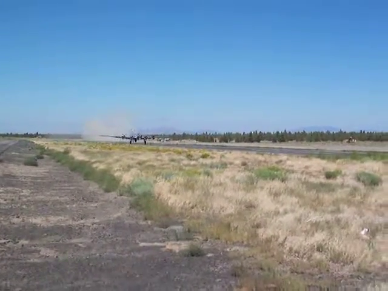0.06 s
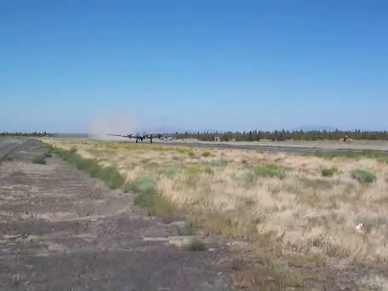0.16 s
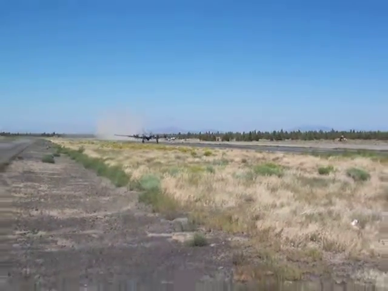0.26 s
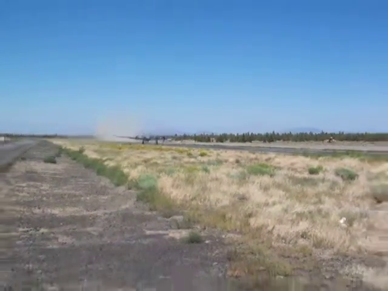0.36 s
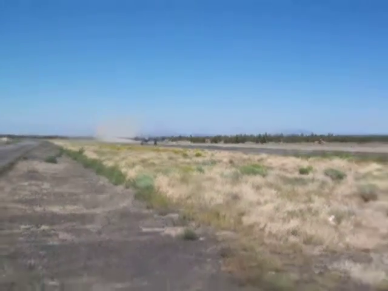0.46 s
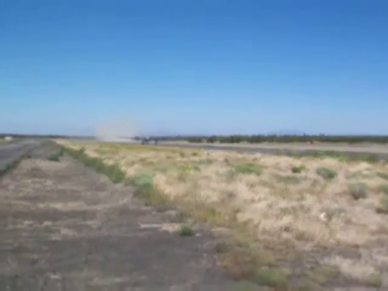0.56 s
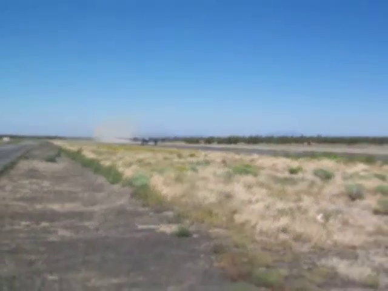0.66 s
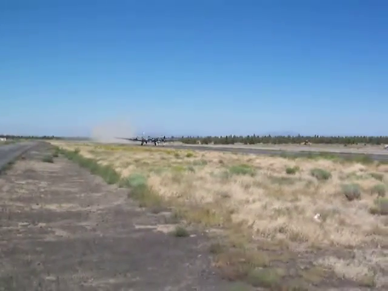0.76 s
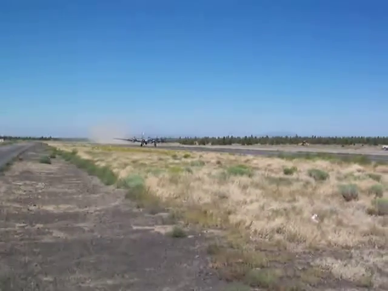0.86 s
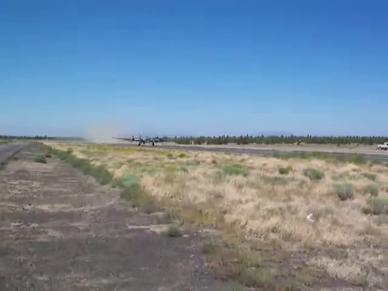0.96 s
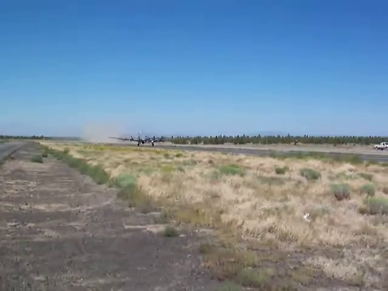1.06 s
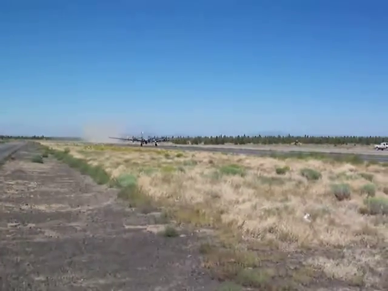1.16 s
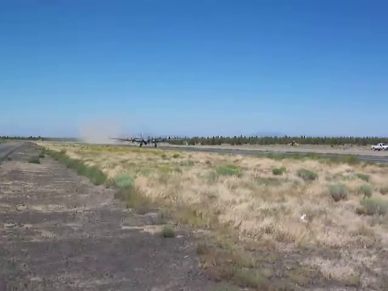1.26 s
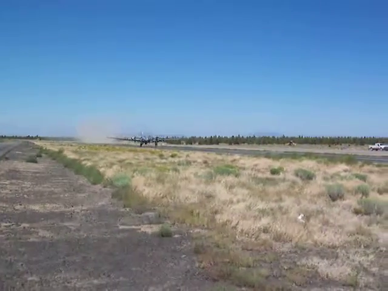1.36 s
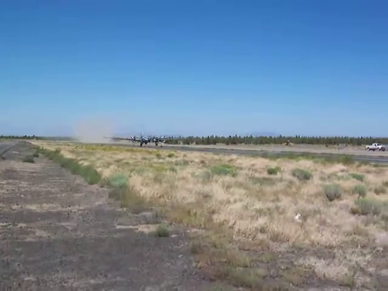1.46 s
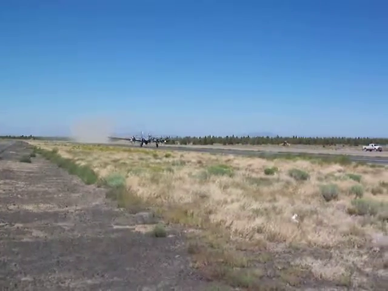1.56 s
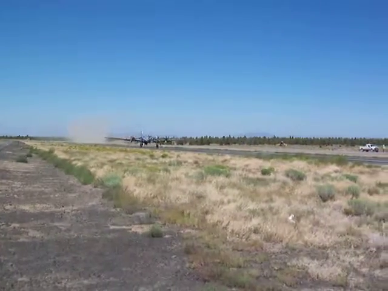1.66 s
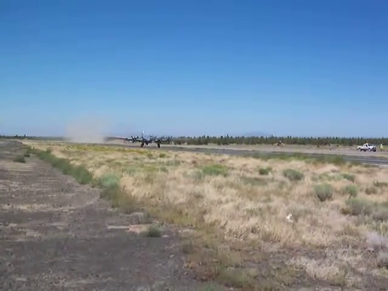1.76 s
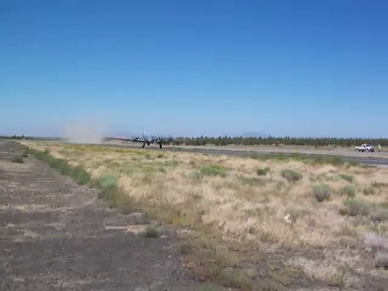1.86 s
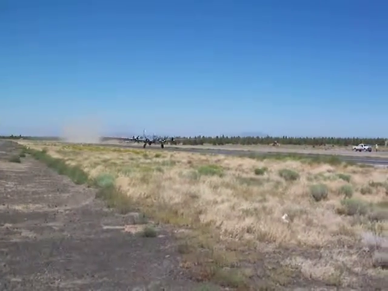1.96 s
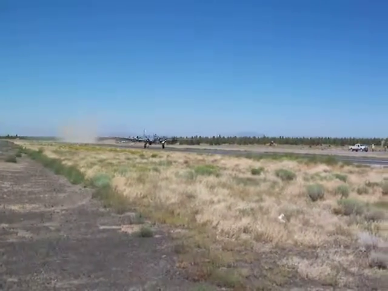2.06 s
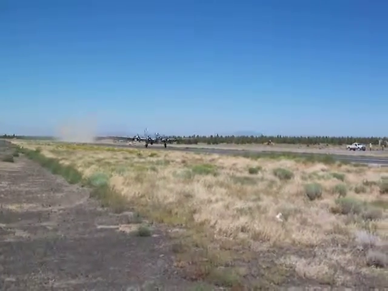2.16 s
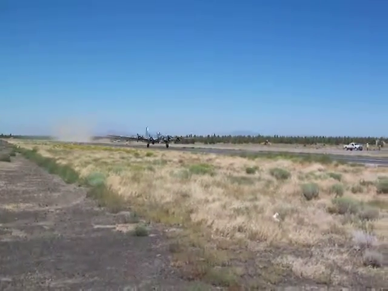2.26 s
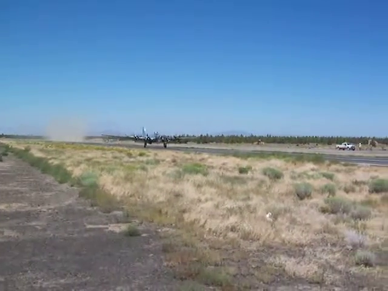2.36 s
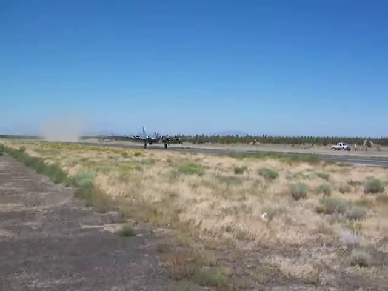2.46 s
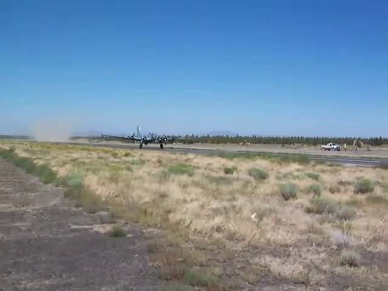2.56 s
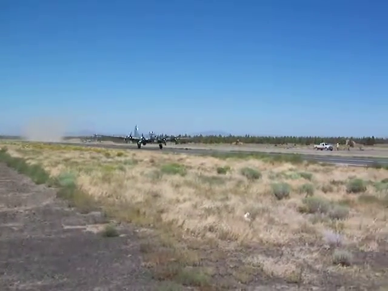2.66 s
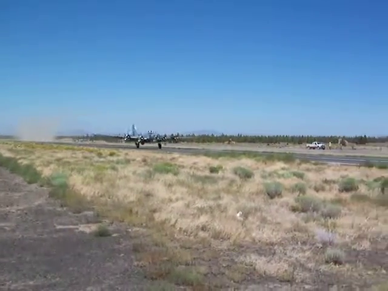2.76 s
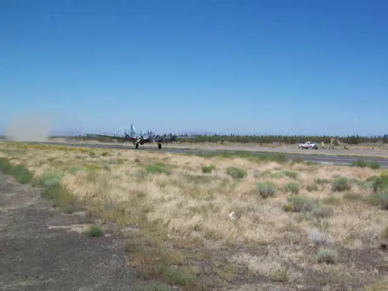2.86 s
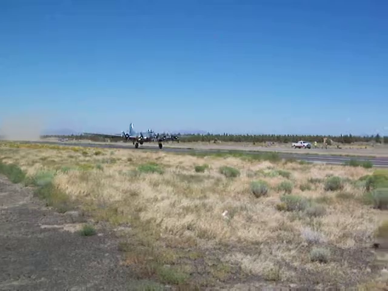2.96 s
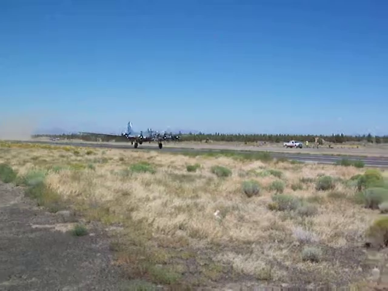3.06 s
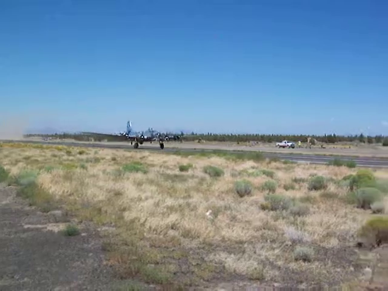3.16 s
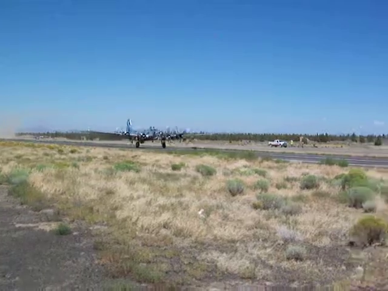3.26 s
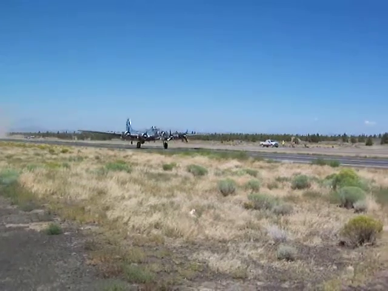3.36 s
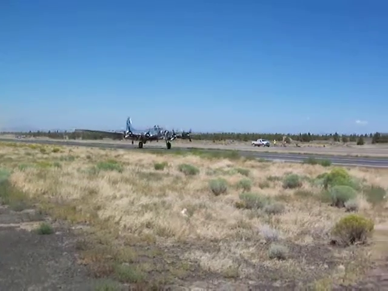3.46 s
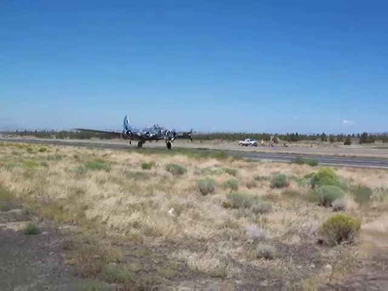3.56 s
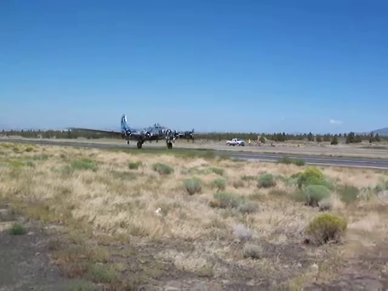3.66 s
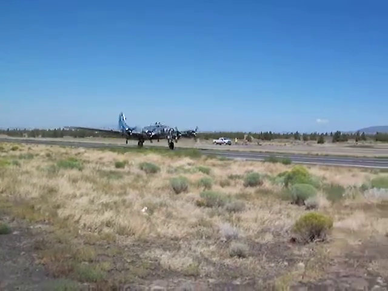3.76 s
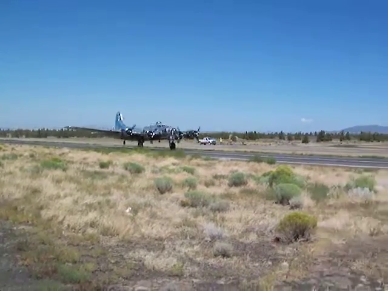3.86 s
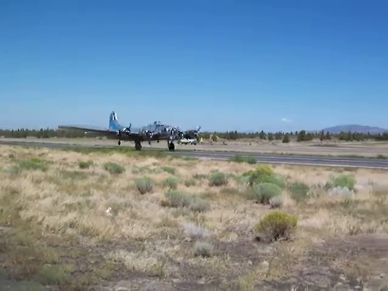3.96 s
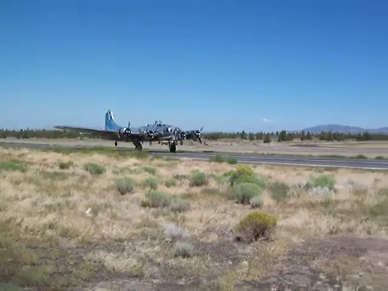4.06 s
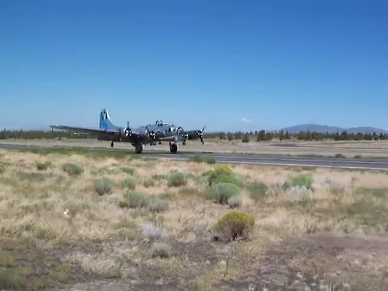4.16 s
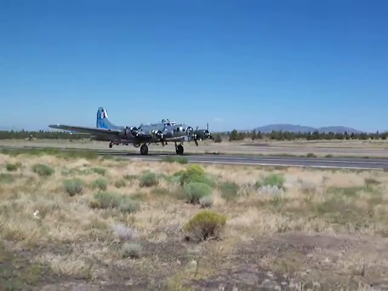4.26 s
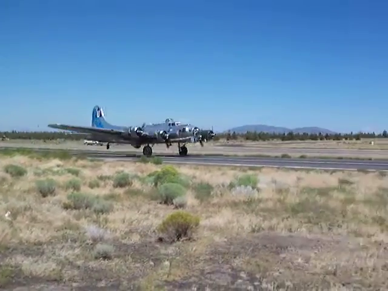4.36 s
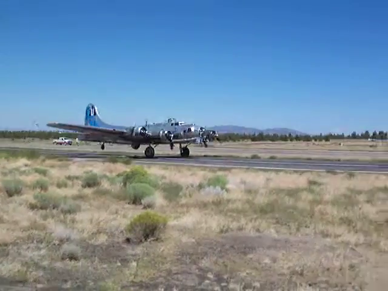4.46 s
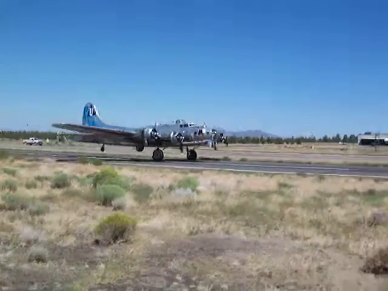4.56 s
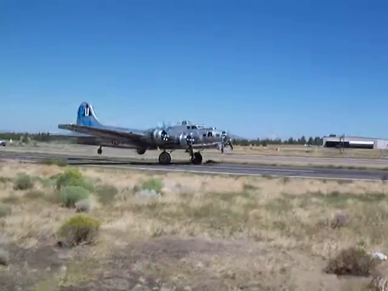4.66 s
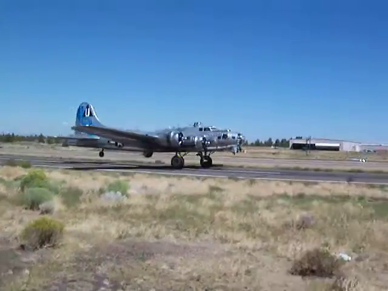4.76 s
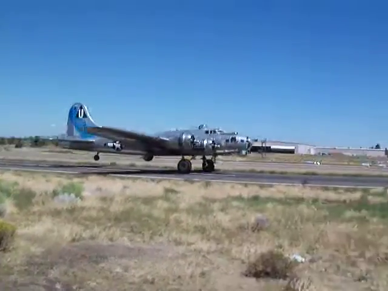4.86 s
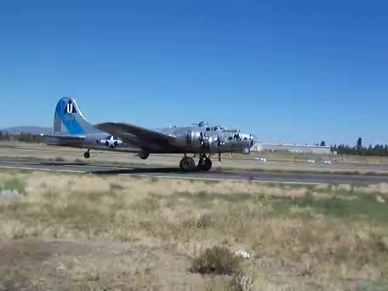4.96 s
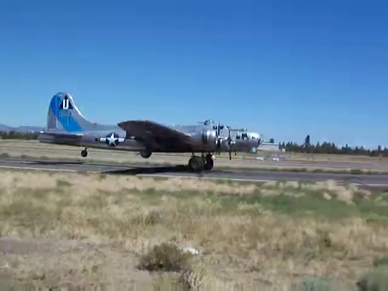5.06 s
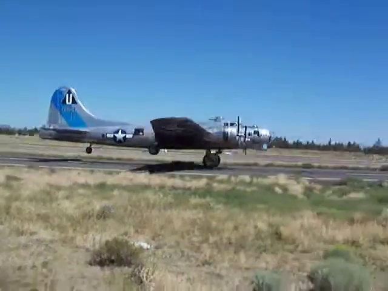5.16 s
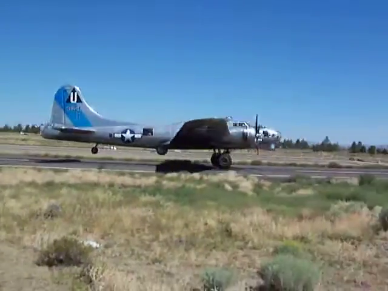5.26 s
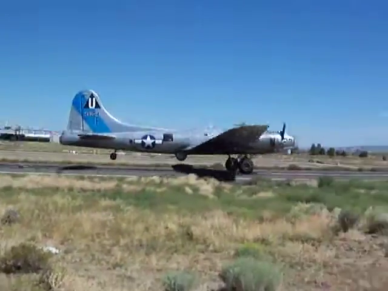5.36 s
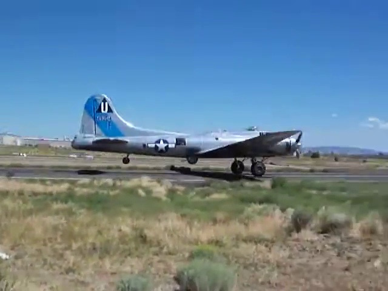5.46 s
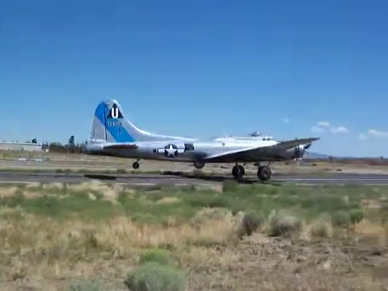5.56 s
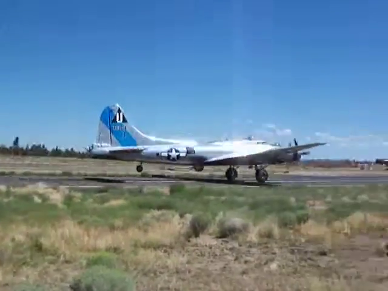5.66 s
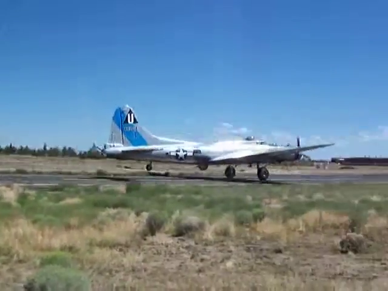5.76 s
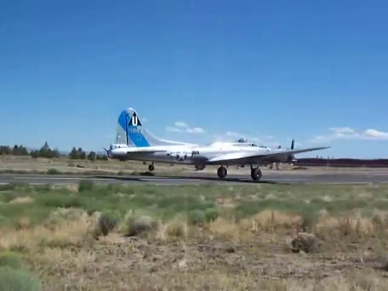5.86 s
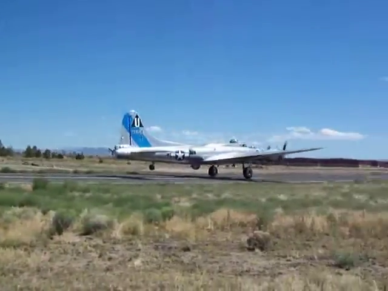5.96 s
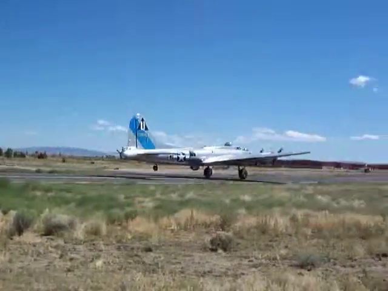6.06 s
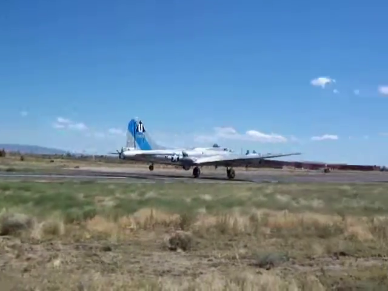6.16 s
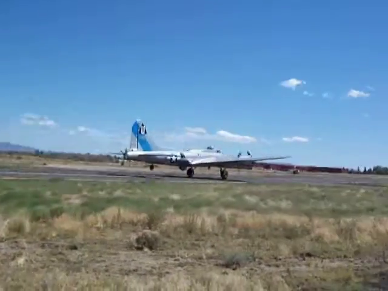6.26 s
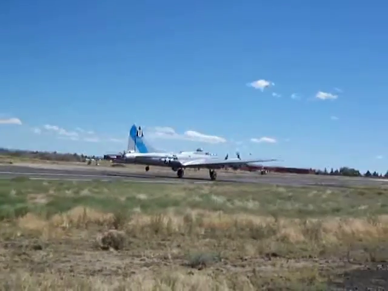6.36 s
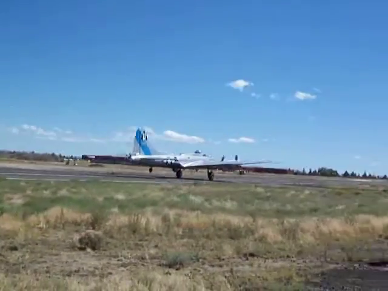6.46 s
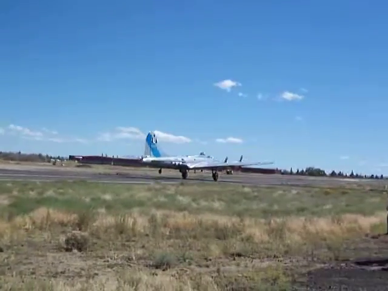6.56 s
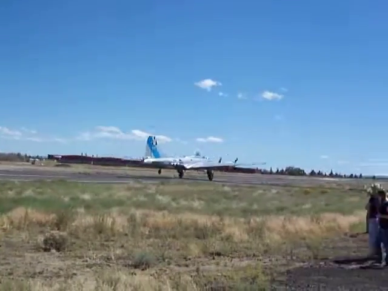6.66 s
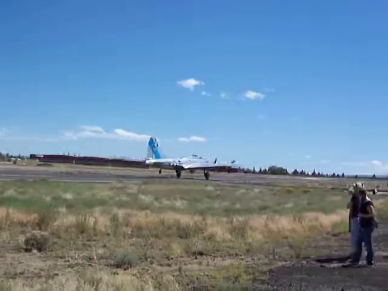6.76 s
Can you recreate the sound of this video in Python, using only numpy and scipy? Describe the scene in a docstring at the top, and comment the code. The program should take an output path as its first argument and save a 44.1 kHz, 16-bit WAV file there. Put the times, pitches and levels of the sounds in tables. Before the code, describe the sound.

Beside an open runway, wind buffets the microphone with low rumble and hard slaps while a four-engined propeller plane drones in the distance. The throbbing drone swells, joined by a rasping exhaust roar and a brief thin whine. The gusts die away as the plane passes close at about five seconds, its pitch sinking, and the engines then fade quickly as it moves off.

```python
"""Beside a runway, a four-engined piston bomber runs up at full power and passes close to a small camera.
Its propellers drone and beat against each other, the radial engines' exhausts roar and rasp with
every firing, a supercharger whines, and all sink in pitch as the plane goes by.
Until it is near, gusts buffet the microphone with rumble and hard slaps of air.
A tick and a brief rustle sound beside the camera in the first second."""
import sys
import numpy as np
from scipy.fft import rfft, irfft, next_fast_len
from scipy.io import wavfile
from scipy.ndimage import map_coordinates

SR = 44100
rng = np.random.default_rng(int(sys.argv[2]) if len(sys.argv) > 2 else 0)


def waveform_to_disk(signal):
    """Save audio, clipped to [-1, 1], as 16-bit WAV at the path in sys.argv[1]."""
    frames = np.transpose(np.atleast_2d(signal))
    scaled = np.clip(frames, -1, 1) * 32767
    samples = np.round(scaled).astype(np.int16)
    wavfile.write(sys.argv[1], SR, samples)


N = 300042
SIDE_ON_S = 5.42  # the plane is side-on to the camera

# The exhaust's swell and fade. Each row: time in seconds, tone level in dB, roar level in dB.
EXHAUST_LEVELS = [(0, -51.5, -42.5), (1.5, -37.5, -44), (4.1, -38.5, -30.5), (4.5, -34, -40.5),
                  (5.15, -33.5, -32.5), (6.1, -43.5, -38), (6.8, -49.5, -55.5)]


def amp(db):
    """Decibels to gain."""
    return 10 ** (np.asarray(db) / 20)


def unit(x):
    """Scale to rms 1."""
    return x / np.sqrt(np.mean(x ** 2) + 1e-20)


def curves(rows):
    """One value per sample for each column after the time."""
    times, *columns = np.transpose(rows)
    return [np.interp(np.arange(N) / SR, times, column) for column in columns]


def swell(peak_s, width_s):
    """A bell-shaped envelope that peaks at 1."""
    return np.exp(-((np.arange(N) / SR - peak_s) / width_s) ** 2)


def wobble(rate):
    """A smooth random curve, rate knots a second."""
    position = np.arange(N) * rate / SR
    coarse = position[::32]
    knots = rng.standard_normal(int(N * rate / SR) + 4)
    return np.interp(position, coarse, map_coordinates(knots, [coarse]))


def filtered(x, response):
    """Filter x by a complex response of frequency."""
    size = next_fast_len(N + SR // 4)
    return irfft(rfft(x, size) * response(np.fft.rfftfreq(size, 1 / SR)), size)[:N]


def band(x, low_hz, high_hz):
    """The part of x between two frequencies."""
    return filtered(x, lambda hz: (hz >= low_hz) & (hz < high_hz))


def lowpass(x, corner_hz, steepness):
    """Roll off the treble."""
    return filtered(x, lambda hz: 1 / (1 + (hz / corner_hz) ** steepness))


def noise(colour):
    """Noise of rms 1 with a spectrum of (Hz, dB) points."""
    points_hz, db = np.transpose(colour)
    response = lambda hz: amp(np.interp(np.log(hz + 1), np.log(points_hz), db))
    return unit(filtered(rng.standard_normal(N), response))


def tone(turns, drift, flutter, flutter_rate=25):
    """A sine of rms 1 whose phase drifts and whose level flutters in the turbulent air."""
    phase = 2 * np.pi * (turns + rng.random()) + drift * wobble(4)
    return unit(np.sin(phase) * (1 + flutter * wobble(flutter_rate)))


def propellers(blade_turns):
    """Three strong blade tones that beat, and overtones smeared by the four unequal shaft speeds."""
    # The drone, each tone beamed its own way as the plane goes by.
    # Each row: time in seconds, then the levels of harmonics 1, 2 and 3 in dB.
    drone_levels = [(0, -41.5, -43.5, -55), (2, -31, -34, -47.5), (3.2, -33, -28.5, -35),
                    (3.45, -22.5, -36, -35), (3.9, -24, -24, -39.5), (4.3, -21, -36, -31.5),
                    (4.58, -24.5, -24, -33.5), (4.9, -20.5, -29.5, -26.5), (5.12, -38, -17.5, -36.5),
                    (5.36, -24.5, -25, -21), (5.6, -22.5, -31.5, -47), (5.85, -26, -34.5, -40),
                    (6.08, -30, -31.5, -48.5), (6.8, -49.5, -50.5, -54)]
    # The buzz above it. Each row: multiple of the blade rate, relative level in dB.
    overtones = [(4, -6), (5, -11.5), (6, -16.5), (7, -15), (8, -17), (9, -15)]
    beat_hz, in_step_s, beat_depths = 1.89, 4.28, (.66, .58, .77)
    t = np.arange(N) / SR
    in_view = 1 - swell(SIDE_ON_S, .39)  # side-on, one propeller hides the rest and the beating stops
    drone = np.zeros(N)
    for k, (db, depth) in enumerate(zip(curves(drone_levels), beat_depths), 1):
        beat = np.sqrt(1 + depth * in_view * np.cos(2 * np.pi * k * beat_hz * (t - in_step_s)))
        drone += amp(db) * beat * tone(k * blade_turns, drift=.15, flutter=.08)
    buzz = sum(amp(db) * tone(round(k) * blade_turns, drift=.9, flutter=.4) for k, db in overtones)
    # the overtones are thrown out sideways, in the plane of the propellers
    buzz_db = curves(EXHAUST_LEVELS)[0] - 6 + 10 * swell(5.05, .42)
    return drone + amp(buzz_db) * buzz


def exhaust(cycles):
    """Unequal cylinders sound the orders of the engine cycle over a low roar."""
    # A nine-cylinder four-stroke's tones. Each row: multiple of the cycle rate, relative level in dB.
    orders = [(1, -9), (2, -3), (3, -8), (4, -4), (5, -1.5), (6, -9), (7, 0), (8, -10), (9, -4), (10, -9),
              (11, -8), (12, -14), (13, -14), (14, -10), (15, -18), (16, -18), (17, -17), (18, -20)]
    # The roar's spectrum. Each row: frequency in Hz, relative level in dB.
    roar_colour = [(30, -21), (70, -12), (130, -1.5), (230, 2.5), (330, -8), (480, -12.5), (800, -16),
                   (1600, -41), (3000, -96)]
    tones_db, roar_db = curves(EXHAUST_LEVELS)
    tones = sum(amp(db) * tone(k * cycles, drift=.4, flutter=.2, flutter_rate=8) for k, db in orders)
    return amp(tones_db) * tones + amp(roar_db) * noise(roar_colour)


def firing_puffs(cycles):
    """The pulsing envelope of four engines at slightly different speeds, nine uneven cylinders each."""
    puffs = np.zeros(N)
    for speed in (.988, .997, 1.004, 1.013):
        firings = 9 * (speed * cycles + rng.random())
        shot = firings.astype(int)
        cylinder_db = 3.8 * rng.standard_normal(9)[shot % 9]
        shot_db = 2.2 * rng.standard_normal(4096)[shot]
        puffs += amp(cylinder_db + shot_db) * np.exp(-(firings % 1) / 1.6)
    return unit(puffs)


def ground_bounce(direct, delay_s=.00159):
    """The ground reflects a late, duller copy."""
    # The bounce along the plane's path. Each row: time in seconds, share reflected.
    strength = [(0, 0.027), (4, 0.054), (4.8, 0.21), (5.5, 0.19), (6.8, 0.37)]
    late = filtered(direct, lambda hz: np.exp(-2j * np.pi * hz * delay_s))
    return curves(strength)[0] * lowpass(late, 2600, 10)


def rasp(cycles):
    """Each firing lets out a puff of hiss; the treble is strongest side-on and dulls to either side."""
    # The rasp's rise and fall. Each row: time in seconds, relative level in dB.
    levels = [(0.13, -57.5), (1.89, -46), (2.68, -44.5), (3.51, -38), (3.6, -36), (4.2, -28), (4.36, -33),
              (4.55, -28), (4.74, -29.5), (5.67, -29.5), (5.81, -36.5), (5.85, -34), (6.02, -44.5),
              (6.8, -58)]
    # The hiss's spectrum. Each row: frequency in Hz, relative level in dB.
    colour = [(150, -24), (400, -7.5), (700, -1.5), (1200, -2), (1700, -3), (2200, -1.5), (2700, 0.5),
              (3200, -2), (4000, -4.5), (5200, -6.5), (7200, -10.5), (8000, -21.5), (8600, -32),
              (9100, -56.5)]
    # Brief bright surges. Each row: time in seconds, half-width in seconds, treble lift in dB.
    surges = [(3.22, .12, 4), (5.5, 0.016, 4), (5.65, .04, 2), (5.885, 0.012, 9)]
    side_on_treble_db, dulling_db_per_s = -8, 2.5
    t = np.arange(N) / SR
    pulsing = 3.3 + firing_puffs(cycles)
    # just past the closest point the rasp barks once a crank turn
    bark_db = 8 * swell(5.65, .19) * (np.exp(-(2 * cycles % 1) / .18) - .3)
    hiss = noise(colour) * pulsing * amp(bark_db + .83 * wobble(30))
    hiss += ground_bounce(hiss)
    body = lowpass(hiss, 4600, 10)
    treble = unit(hiss - body)
    body /= np.std(band(hiss, 2000, 4500))
    # heard from behind, the exhausts are throatier
    behind = np.interp(t, [5.6, 6.5], [0, .45])
    throat = behind * filtered(body, lambda hz: np.exp(-((hz - 1200) / 500) ** 2))
    # the air swallows the highs while the plane is far
    air_loss = np.interp(t, [0, 1.3, 2.8], [.4, .25, 0])
    body -= air_loss * (body - lowpass(body, 3500, 12))
    treble_db = side_on_treble_db - dulling_db_per_s * np.abs(t - SIDE_ON_S)
    treble_db += sum(db * swell(peak_s, width_s) for peak_s, width_s, db in surges)
    return amp(curves(levels)[0] - .83) * (body + throat + amp(treble_db) * treble)


def supercharger():
    """A thin two-tone whine beamed forward from the intakes, faint whistles and two shrill hisses."""
    # The main whine. Each row: time in seconds, pitch in Hz, level in dB.
    whine_path = [(0, 2620, -78), (2.6, 2685, -59), (3.54, 2683, -51), (3.68, 2670, -39.5),
                  (3.84, 2666, -39), (3.96, 2659, -47), (4.1, 2650, -38), (4.22, 2640, -38),
                  (4.33, 2618, -52), (5.5, 2280, -100)]
    # Distant engine whistles. Each row: pitch in Hz, opening level in dB, level at two seconds in dB.
    whistles = [(3140, -73, -60.5), (3570, -72.5, -75)]
    upper_ratio, upper_db = 1.143, -8  # the second tone against the first
    t = np.arange(N) / SR
    hz, db = curves(whine_path)
    turns = np.cumsum(hz) / SR
    whine = amp(db) * tone(turns, drift=.7, flutter=.4, flutter_rate=45)
    whine += amp(db + upper_db) * tone(upper_ratio * turns, drift=1.5, flutter=.5, flutter_rate=45)
    for pitch_hz, first_db, later_db in whistles:
        whistle_db = np.interp(t, [0, 2, 3.5, 4.6], [first_db, later_db, later_db, -100])
        whine += amp(whistle_db) * tone(pitch_hz * t, drift=1.3, flutter=.42)
    hiss_gain = amp(-33) * swell(4.18, .08) + amp(-31) * swell(5.58, .05)
    return whine + hiss_gain * noise([(1800, -44), (2400, -4.5), (2680, 0), (3000, -2.5), (3800, -47.5)])


def gust(start_s, hold_s, release_s, attack_s=.07):
    """The envelope of one gust: it rises fast, holds and dies away."""
    t = np.arange(N) / SR
    return np.exp(-np.maximum(start_s - t, 0) / attack_s - np.maximum(t - start_s - hold_s, 0) / release_s)


def eddies(times, sizes, widths_ms):
    """Each eddy crossing the microphone port is one smooth pressure swing; narrow ones are brighter."""
    lag = np.arange(-400, 401)
    phase = np.exp(2j * np.pi * rng.random((len(times), 1)))
    swing = phase / (1 + 1j * lag / (SR * widths_ms[:, None] / 1000)) ** 2
    pulses = sizes[:, None] * swing.real * np.hanning(len(lag))
    samples = np.clip((times[:, None] * SR).astype(int) + lag, 0, N)
    return np.bincount(samples.ravel(), pulses.ravel(), N + 1)[:N]


def eddy_swarm(count=1900):
    """Small eddies of mixed size and width buffet the port in clumps."""
    size, width = np.clip(rng.standard_normal((count, 2)).T, -1.5, 1.5)
    swarm = eddies(rng.random(count) * N / SR, amp(2.1 * size), .84 * np.exp(.27 * width))
    swarm *= amp(4.2 * np.tanh(wobble(45)))
    return swarm / np.std(band(swarm, 280, 1000))


def wind():
    """Air hits the microphone: a lumpy rumble, small eddies that die with each gust, and hard slaps."""
    # The breeze between gusts. Each row: time in seconds, rumble in dB, eddies in dB.
    breeze = [(0, -35, -41), (1.2, -30.5, -33.5), (2.2, -23, -30.5), (2.5, -21, -41.5), (3.5, -31, -48.5),
              (5.1, -44.5, -87), (6.2, -32.5, -93), (6.8, -43, -103.5)]
    # The gusts. Each row: start in seconds, hold in seconds, rumble in dB, eddies in dB.
    gusts = [(0, 0.12, -30, -34), (0.429, .08, -35, -33), (0.72, .14, -36, -31.5),
             (1.133, 0.29, -21, -31.5), (1.553, 0.47, -27.5, -28.5), (2.06, 0.06, -19.5, -28),
             (2.28, .13, -19, -29), (2.705, 0.18, -22.5, -31), (3.034, 0.12, -19, -35),
             (3.265, .16, -19, -34), (3.698, 0.4, -24.5, -41)]
    # The rumble's spectrum. Each row: frequency in Hz, relative level in dB.
    rumble_colour = [(8, -17.5), (20, -3.5), (35, 0), (60, -2.5), (120, -8), (220, -16), (400, -35.5),
                     (900, -70.5), (2000, -110)]
    # Slaps of the hardest eddies. Each row: start in seconds, relative level in dB.
    slap_hits = [(0.034, -19), (0.047, -35.5), (0.096, -25), (0.162, -25), (0.177, -25.5), (0.245, -21.5),
                 (0.29, -28), (0.332, -25.5), (0.365, -24.5), (0.408, -23), (0.862, -24), (0.896, -23),
                 (1.145, -21), (1.203, -21), (1.265, -18.5), (1.395, -16.5), (1.494, -26.5), (1.631, -28.5),
                 (1.751, -23), (1.788, -26), (1.814, -19), (1.896, -18.5), (2.035, -21.5), (2.1, -18.5),
                 (2.201, -19.5), (2.287, -12.5), (2.433, -22.5), (2.718, -19.5), (2.744, -13),
                 (2.771, -27.5), (2.838, -21), (3.02, -21), (3.193, -12.5), (3.286, -20.5), (3.308, -18),
                 (3.426, -19.5)]
    slap_rise_s, wake_decay_s, port_hz = .001976, .009, 2050
    t = np.arange(N) / SR
    rumble_gain, eddy_gain = amp(curves(breeze))
    for start_s, hold_s, rumble_db, eddy_db in gusts:
        rumble_gain = np.maximum(rumble_gain, amp(rumble_db) * gust(start_s, hold_s, release_s=.14))
        eddy_gain = np.maximum(eddy_gain, amp(eddy_db) * gust(start_s, hold_s, release_s=.03))
    rumble = rumble_gain * unit(noise(rumble_colour) * amp(.86 * wobble(10)))
    swarm = eddy_swarm()
    onsets, slap_db = np.transpose(slap_hits)
    peaks = onsets + slap_rise_s
    slaps = eddies(peaks, amp(slap_db + 6.5), widths_ms=np.full(len(peaks), .56))
    slaps = lowpass(slaps, port_hz, 6)  # the port smooths the fastest swings
    # each slap stirs up a short wake of small eddies
    for peak_s, db in zip(peaks, slap_db):
        wake = amp(db - 7) * (t >= peak_s) * np.exp(-np.abs(t - peak_s) / wake_decay_s)
        eddy_gain = np.maximum(eddy_gain, wake)
    # the flow runs smooth for a moment before a big eddy breaks away
    until_slap_s = peaks[np.minimum(np.searchsorted(peaks, t), len(peaks) - 1)] - t
    lull = 1 - .65 * np.sin(np.pi * np.clip(until_slap_s / .016, 0, 1)) ** 2
    pressure = rumble + eddy_gain * lull * swarm
    # air forced through the port fizzes at the crest of each swing
    fizz = noise([(2000, -6.5), (4000, -4.5), (7400, -3.5), (8300, -15.5), (9000, -40.5)])
    return pressure + amp(-36) * np.maximum(pressure, 0) * fizz + slaps


def tick():
    """One sharp tick beside the camera."""
    snap = noise([(500, -20), (2000, -2.5), (5000, -9), (7200, -8), (9000, -45)])
    return amp(-31) * swell(.0505, .0004) * snap


def rustle(flutter_hz=255):
    """A brief, fluttering rustle beside the camera."""
    flutter = 1 + np.sin(2 * np.pi * flutter_hz * np.arange(N) / SR)
    hiss = noise([(1500, -29.5), (3000, -2.5), (4100, -6.5), (4800, -18), (9000, -33.5)])
    return amp(-54.5) * swell(.67, .038) * flutter * hiss


def scene():
    """The bomber passes through the wind, its propellers and exhausts locked together by the gearing."""
    # The pass-by's pitch, Doppler shift included. Each row: time in seconds, blade-passing rate in Hz.
    blade_rate = [(0, 81.37), (1, 82.83), (2, 83.7), (3, 84.38), (3.5, 82.3), (4, 80.46), (4.5, 78.86),
                  (4.8, 75.9), (5, 73.1), (5.2, 71.74), (5.4, 69.85), (5.6, 67.4), (6, 65.2), (6.8, 62.66)]
    blade_turns = np.cumsum(curves(blade_rate)[0]) / SR
    # three-bladed propellers are geared 9:16 to crankshafts that turn twice a cycle
    cycles = blade_turns / 3 * 16 / 9 / 2
    plane = propellers(blade_turns) + exhaust(cycles) + rasp(cycles) + supercharger()
    return (plane + wind() + tick() + rustle())[None]


def record(dry):
    """The camera rounds off the highest peaks and keeps nothing above its band limit."""
    ceiling, fade_s, top_hz = .55, .004, 9050
    rounded = dry[0] / (1 + (dry[0] / ceiling) ** 6) ** (1 / 6)
    fade = np.interp(np.arange(N), [0, SR * fade_s, N - SR * fade_s, N], [0, 1, 1, 0])
    return band(fade * rounded, 0, top_hz)[None]


dry = scene()
out = record(dry)
waveform_to_disk(out)
```